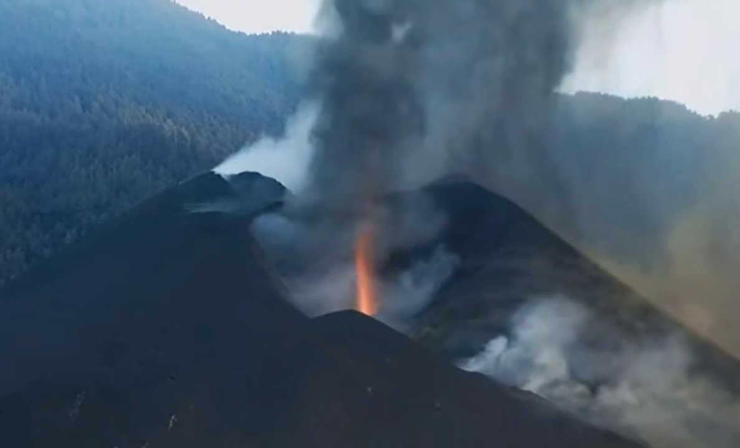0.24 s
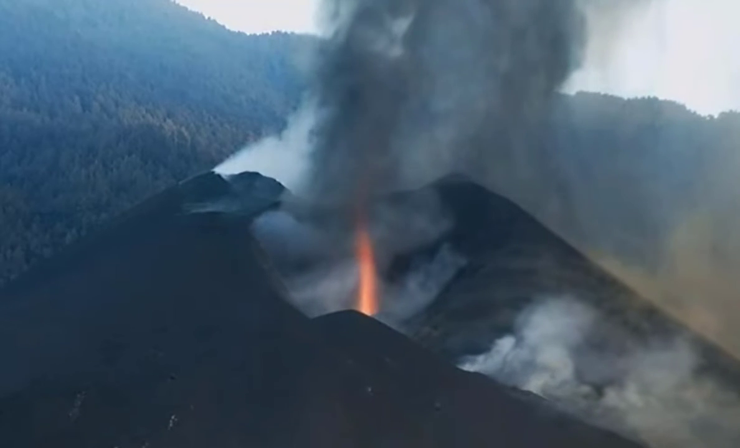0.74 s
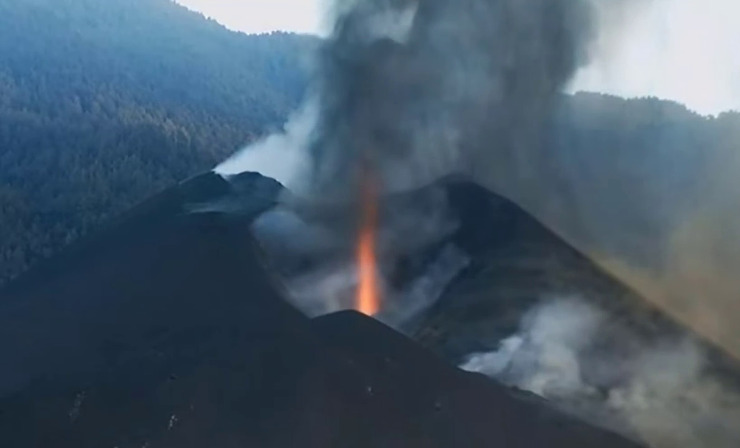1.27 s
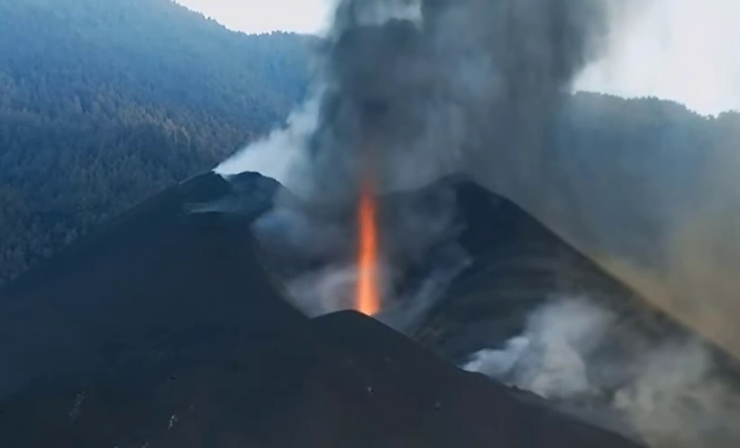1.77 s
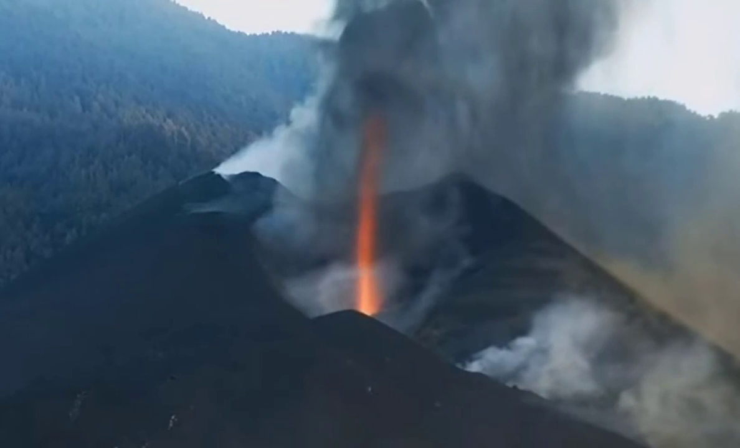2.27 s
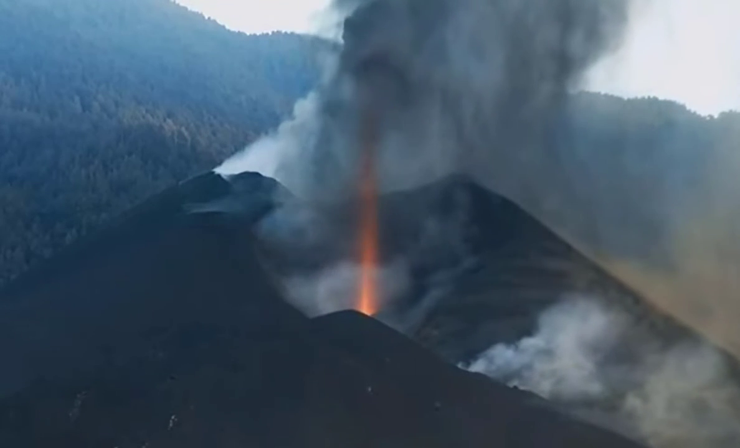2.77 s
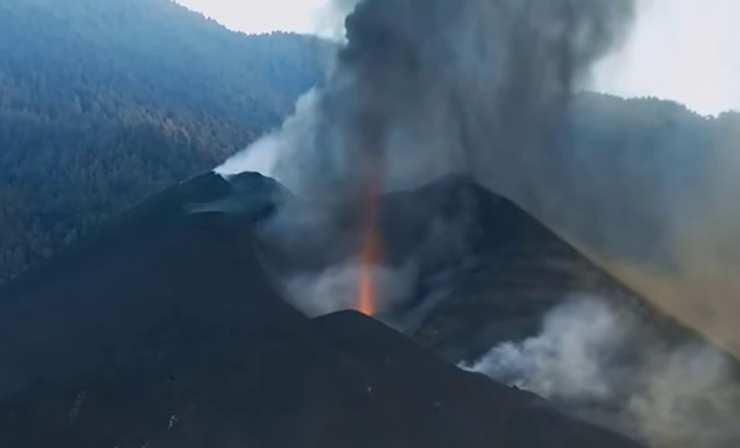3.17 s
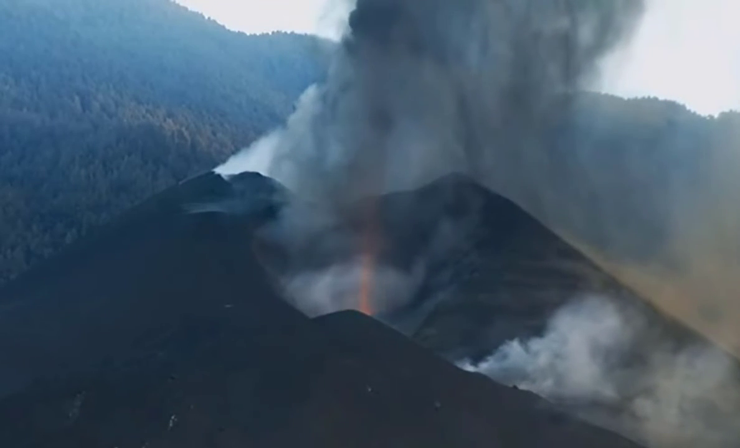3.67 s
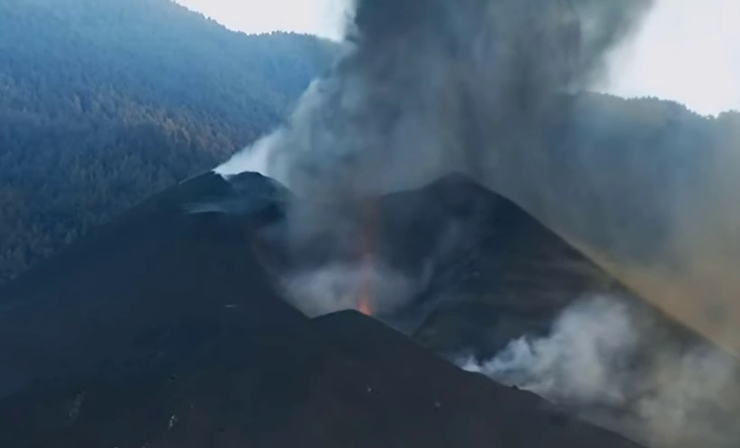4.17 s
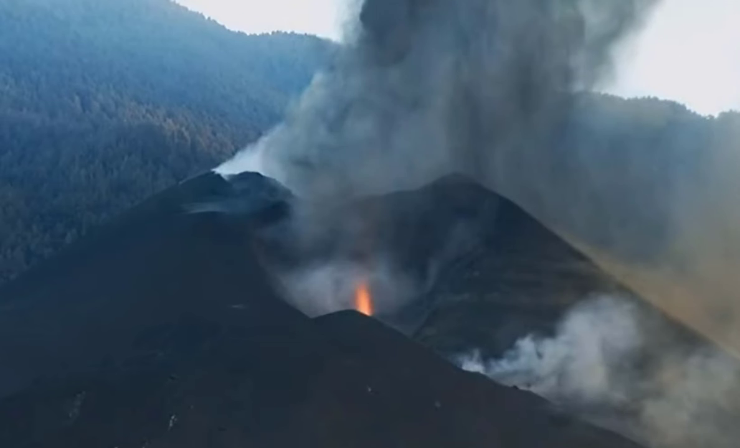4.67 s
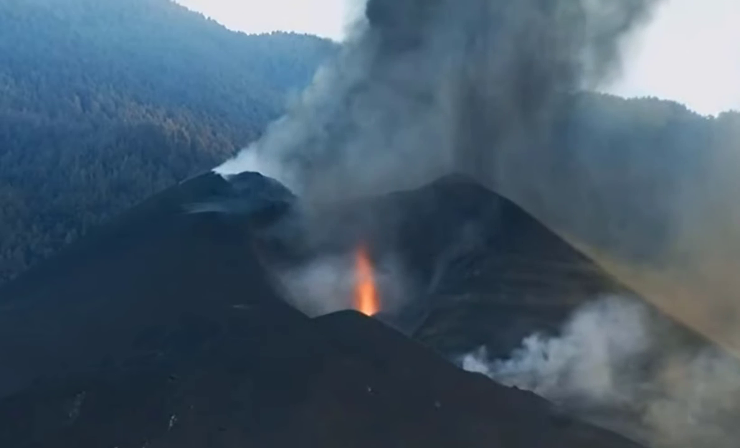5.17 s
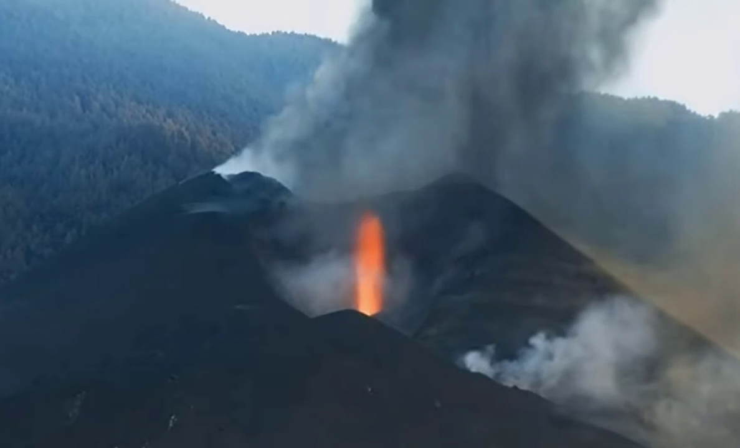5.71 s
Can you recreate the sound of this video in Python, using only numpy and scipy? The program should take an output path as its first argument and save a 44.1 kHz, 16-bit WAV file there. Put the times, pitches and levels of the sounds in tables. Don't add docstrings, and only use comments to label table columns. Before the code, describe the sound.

A continuous distant volcanic roar, heard outdoors in one channel across a great stretch of air. Most of the energy is deep rumble around 100 to 200 Hz, with a throaty, slightly hollow growl above it and a soft rush near 1 kHz; the treble is nearly empty apart from very faint hiss and air in trees. From 0 to 1.5 s it is low and subdued, fluttering unevenly. It builds from 1.7 s and swells sharply at about 2.25 s, dips at 2.5, then holds strong and grows heavier in bass until 3.7. It eases around 4.05, surges with more rush at 4.4, sags at 4.75, and rises again from 5.2 to its fullest at the end, near 5.9 s. Rounded gas bursts and brief lulls ripple throughout, blurred by short dull echoes from the slopes. A faint ground tremor strengthens after 2.2 s. The roar never stops.

```python
import sys
import numpy as np
from scipy import signal
from scipy.fft import rfft, irfft, next_fast_len
from scipy.io import wavfile
from scipy.ndimage import uniform_filter1d, map_coordinates

SR = 44100
rng = np.random.default_rng(int(sys.argv[2]) if len(sys.argv) > 2 else 0)


def ratio(d):
    e = np.asarray(d, float) / 20
    return 10 ** e


def transcribe(signal):
    frames = np.atleast_2d(signal).T
    limited = np.clip(frames, -1, 1)
    pcm = np.round(limited * 32767).astype(np.int16)
    wavfile.write(sys.argv[1], SR, pcm)


N = 262123


def rms_one(x):
    return x / np.sqrt(np.mean(x ** 2) + 1e-20)


def in_time(rows):
    s, *columns = np.transpose(rows)
    return [np.interp(np.arange(N) / SR, s, column) for column in columns]


def drift(rate_hz):
    pole = np.exp(-80 * np.pi * rate_hz / SR)
    noise = rng.standard_normal(N // 40 + 2002)
    slow = signal.lfilter([1], [1, -2 * pole, pole * pole], noise)[2000:]
    return np.interp(np.arange(N) / 40, np.arange(len(slow)), rms_one(slow))


# centre in Hz, width in Hz, lift in dB.
VENT_MODES = [(154.5, 13, 4.5), (330, 13, 4), (384, 16, 1), (458, 10, 2)]


def vent(hz):
    lift_db = sum(db / (1 + (2 * (hz - mid_hz) / width_hz) ** 2) for mid_hz, width_hz, db in VENT_MODES)
    return ratio(lift_db)


# delay in seconds, level in dB, low-pass corner in Hz.
ECHOES = [
    (0.0111, -18.5, 447),
    (0.022, -15, 705),
]


def echoes(hz):
    response = 1
    for delay_s, db, cut_hz in ECHOES:
        dulling = np.sqrt(1 + (hz / cut_hz) ** 4)
        response = response - ratio(db) * np.exp(-2j * np.pi * hz * delay_s) / dulling
    return response


def turbulence(spectrum, flicker_db, flicker_hz, even_s, count):
    size = next_fast_len(N)
    hz = np.maximum(np.fft.rfftfreq(size, 1 / SR), 1)
    points_hz, points_db = np.transpose(spectrum)
    colour = ratio(np.interp(np.log(hz), np.log(points_hz), points_db, left=-200, right=-200))
    shaped = rfft(rng.standard_normal(size)) * colour * vent(hz) * echoes(hz)
    place = (count - 1) * np.log(hz / points_hz[0]) / np.log(points_hz[-1] / points_hz[0])
    out = 0
    for band in range(count):
        share = np.clip(1 - abs(place - band), 0, 1)
        out = out + irfft(shaped * share, size)[:N] * ratio(flicker_db * drift(flicker_hz))
    window = int(even_s * SR)
    swell = uniform_filter1d(uniform_filter1d(out ** 2, window), window)
    return rms_one(out / np.sqrt(swell))


# frequency in Hz, level in dB per Hz.
FOREST_SPECTRUM = [(900, -28.5), (1800, -3), (2500, -4), (3300, -6.5), (4500, -22), (6000, -51.5)]


def forest():
    return ratio(-84) * turbulence(FOREST_SPECTRUM, flicker_db=1.0, flicker_hz=4, even_s=0.6, count=6)


# time in seconds, level in dB.
SHAKE = [
    (0.0, -62.5),
    (0.3, -67),
    (0.65, -62),
    (1.85, -60),
    (2.25, -50.5),
    (3.45, -49.5),
    (4.1, -47.5),
    (4.5, -53.5),
    (5.7, -53),
    (5.94, -48),
]
# frequency in Hz, level in dB per Hz.
TREMOR_SPECTRUM = [(8, -43), (12, -27.5), (28, -27.5), (38, -21.5), (50, -10), (64, -12.5), (75, 0),
                   (98, -28), (160, -120)]


def ground():
    shake_db, = in_time(SHAKE)
    return ratio(shake_db) * turbulence(TREMOR_SPECTRUM, flicker_db=-3.0, flicker_hz=3, even_s=0.49, count=2)


# time in seconds, lift in dB, eddy pitch in Hz, spread in seconds.
SLUGS = [(0.58, 4.5, 350.0, 0.035), (0.67, -5, 215.0, 0.046), (0.92, -4.2, 140.0, 0.047),
         (0.95, 3, 215.0, 0.048), (1.1, 1, 141, 0.069), (1.35, 2, 139, 0.056), (1.51, -3.0, 140.0, 0.057),
         (1.73, 5, 215.0, 0.047), (1.84, -2, 140.0, 0.052), (2.1, -4.5, 142, 0.052),
         (2.58, -0.5, 140.0, 0.052), (2.84, 3, 348, 0.052), (3.11, -3, 216, 0.052),
         (3.23, -3.0, 140.5, 0.052), (3.3, 4.2, 353, 0.039), (3.55, -3, 211, 0.052),
         (3.7, 6.5, 140.0, 0.037), (3.93, 2.5, 1100, 0.064), (4.24, 4, 216, 0.033),
         (4.28, 1.5, 140.0, 0.052), (4.54, -3.5, 214, 0.052), (4.54, 3.5, 142.5, 0.052),
         (4.58, -2, 349, 0.052), (4.65, 2, 1100, 0.067), (4.92, 3.5, 139.6, 0.045), (5.14, 4, 215.0, 0.06),
         (5.37, -0.5, 140.4, 0.052), (5.52, 2, 139, 0.052), (5.68, -6, 140.6, 0.052),
         (5.73, 4.5, 215.0, 0.025)]


def slugs(eddy_hz):
    reach_octaves = 0.29
    t = np.arange(0, N, 64) / SR
    s, lift_db, slug_hz, spread_s = np.transpose(SLUGS)[:, :, None]
    near = np.exp(-0.5 * (np.log2(slug_hz / eddy_hz) / reach_octaves) ** 2)
    passing = np.exp(-0.5 * ((t - s) / spread_s) ** 2)
    return np.interp(np.arange(N) / SR, t, np.sum(lift_db * near * passing, axis=0))


# time in seconds, force as rush level in dB, bulk of the gas as extra bass in dB.
JET = [(0.0, -59.5, 1), (0.6, -56.5, 0), (1.0, -55.0, -1), (1.45, -55.5, -4), (1.72, -51.5, -1.0),
       (1.95, -51.0, -1), (2.25, -43, 0), (2.5, -47.0, 0.0), (2.85, -43.5, 1.5), (3.4, -43.5, 2.5),
       (3.7, -44.5, 3), (4.05, -46.5, 1), (4.4, -39.5, -0.5), (4.75, -44.5, 1.5), (5.2, -40, 2),
       (5.5, -39.5, 2.0), (5.7, -39.5, 0.5), (5.94, -37.5, 1.5)]
# frequency in Hz, level in dB per Hz.
RUMBLE_SPECTRUM = [(35, -52), (60, -35), (80, -15), (106, -5.5), (125, -1), (150, -1), (172, 0.5),
                   (190, -7.5), (230, -60)]
GROWL_SPECTRUM = [(140, -60), (170, -11), (188, -0.5), (204, -0.5), (230, -7), (252, -4.5), (275, -19),
                  (300, -28.5), (390, -78)]
ROAR_SPECTRUM = [(150, -37), (260, -2.5), (280, -3), (334, -2), (366, -7.5), (393, -9), (489, -13.5),
                 (539, -18), (720, -32), (940, -56.5), (1580, -120)]
RUSH_SPECTRUM = [(380, -35.5), (650, -7), (703, -8), (886, -1), (1180, -0.5), (1570, -7.5), (2260, -27.5),
                 (2500, -32), (3250, -55.5), (5500, -120)]
# offset in dB, share of the bulk (ratio), eddy pitch in Hz.
RUMBLE_OVER = (17.94, 1.07, 120)
GROWL_OVER = (15.91, .95, 200)
ROAR_OVER = (9.42, 0.84, 350)


def jet():
    force_db, bulk_db = in_time(JET)
    rumble = turbulence(RUMBLE_SPECTRUM, flicker_db=-0.8, flicker_hz=4, even_s=0.064, count=3)
    growl = turbulence(GROWL_SPECTRUM, flicker_db=-0.4, flicker_hz=4.2, even_s=0.098, count=3)
    roar = turbulence(ROAR_SPECTRUM, flicker_db=1.0, flicker_hz=8.1, even_s=0.11, count=4)
    rush = turbulence(RUSH_SPECTRUM, flicker_db=0.5, flicker_hz=7.1, even_s=0.15, count=5)
    mix = rush * ratio(slugs(1100))
    for layer, over in [(rumble, RUMBLE_OVER), (growl, GROWL_OVER), (roar, ROAR_OVER)]:
        offset_db, bulk_share, eddy_hz = over
        mix = mix + layer * ratio(offset_db + bulk_share * bulk_db + slugs(eddy_hz))
    return ratio(force_db) * mix


def scene():
    return (forest() + ground() + jet())[None]


def rate_converter(x):
    source_rate_hz, slip_start_ticks = 48000, 0.958
    ticks = np.arange(N) * source_rate_hz / SR + slip_start_ticks
    error_samples = (0.5 - ticks % 1) * SR / source_rate_hz
    return map_coordinates(x, [np.arange(N) + error_samples], order=3, mode="nearest")


# low edge in Hz, high edge in Hz.
TOP_BANDS = [(12403, 13092), (13092, 13781), (13781, 14470), (14470, 15159), (15159, 15848)]
AUDIBLE_DB = [-94.5, -91, -92, -88, -84.5]
LINE_MARGINS_DB = [-6, 4, 7, 4, 4]


def mute_faint_treble(x):
    frame, frame_start, scatter_db = 1024, 450, 1.5
    n, k = np.arange(2 * frame) + 0.5, np.arange(frame) + 0.5
    window = np.sin(np.pi * n / 2 / frame)
    basis = window * np.cos(np.pi / frame * np.outer(k, n + frame / 2)) * np.sqrt(2 / frame)
    lead = 2 * frame - frame_start
    tail = 3 * frame - (lead + N) % frame
    blocks = np.concatenate([np.zeros(lead), x, np.zeros(tail)]).reshape(-1, frame)
    lines = np.hstack([blocks[:-1], blocks[1:]]) @ basis.T
    hz = k * SR / 2 / frame
    for (low_hz, high_hz), audible_db, margin_db in zip(TOP_BANDS, AUDIBLE_DB, LINE_MARGINS_DB):
        band = (hz >= low_hz) & (hz < high_hz)
        threshold_db = audible_db + scatter_db * rng.standard_normal((len(lines), 1))
        band_rms = np.sqrt(np.sum(lines[:, band] ** 2, axis=1, keepdims=True) / frame)
        heard = band_rms > ratio(threshold_db)
        faint = ratio(threshold_db + margin_db) * np.sqrt(frame / band.sum())
        lines[:, band] *= heard * (abs(lines[:, band]) > faint)
    frames = lines @ basis
    lapped = frames[:-1, frame:] + frames[1:, :frame]
    return lapped.ravel()[lead - frame:][:N]


def roll_off(x):
    return signal.sosfilt(signal.butter(12, 15700, fs=SR, output="sos"), x)


def record(dry):
    hiss = ratio(-88) * rng.standard_normal(N)
    mix = mute_faint_treble(rate_converter(dry[0]) + hiss)[None]
    return roll_off(mix)


dry = scene()
out = record(dry)
transcribe(out)
```